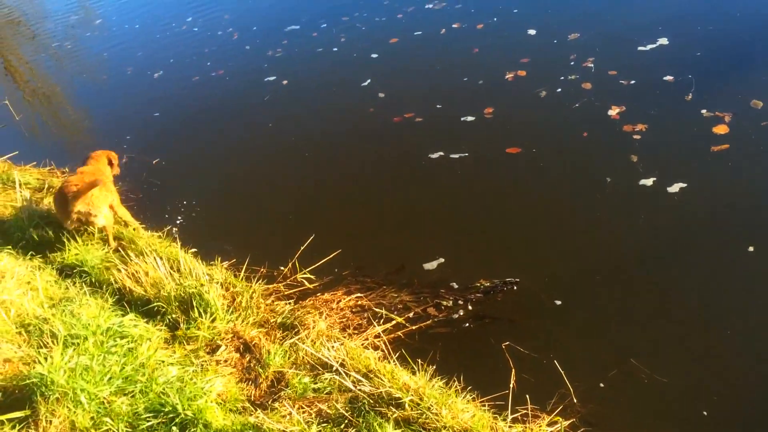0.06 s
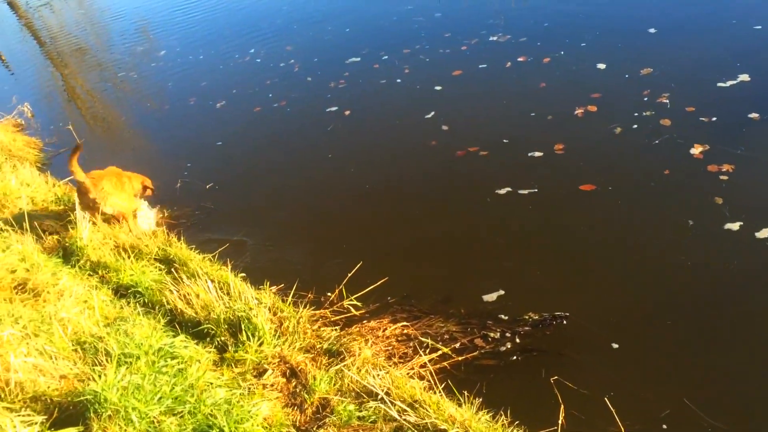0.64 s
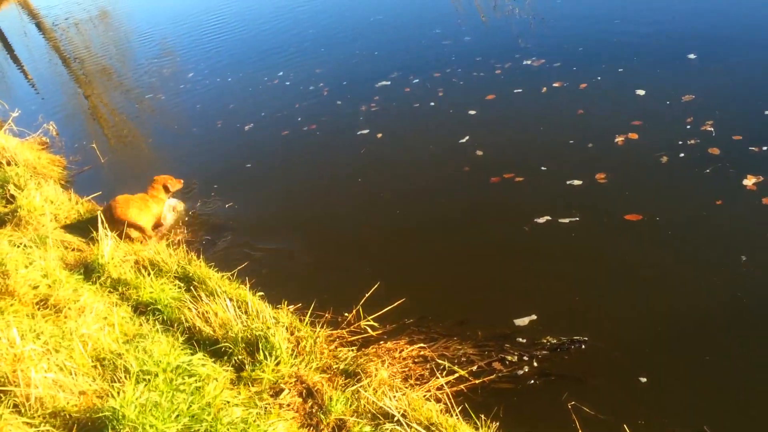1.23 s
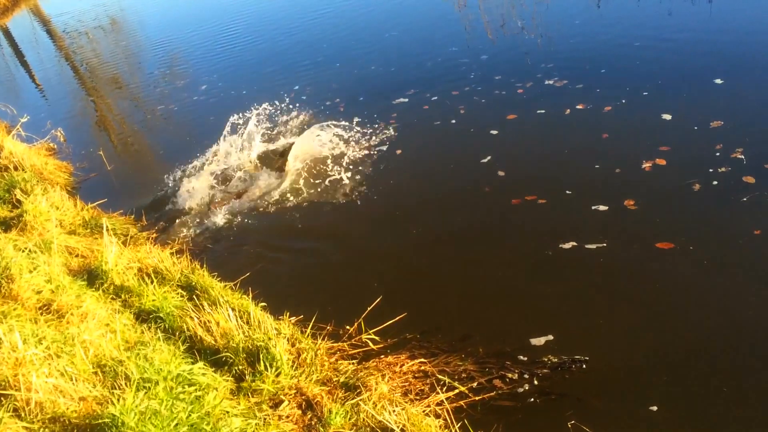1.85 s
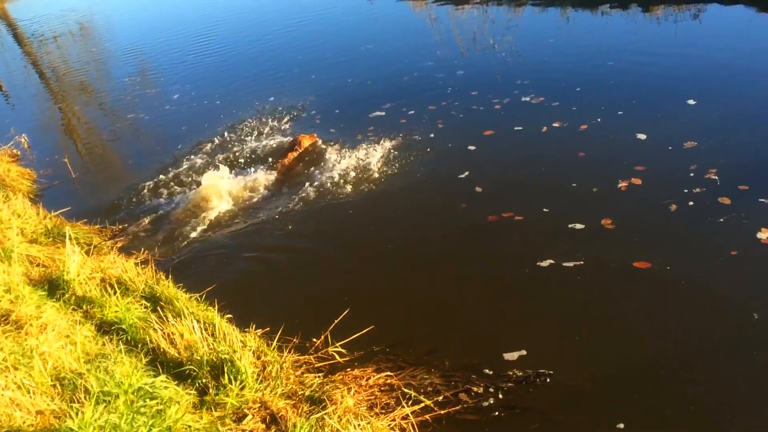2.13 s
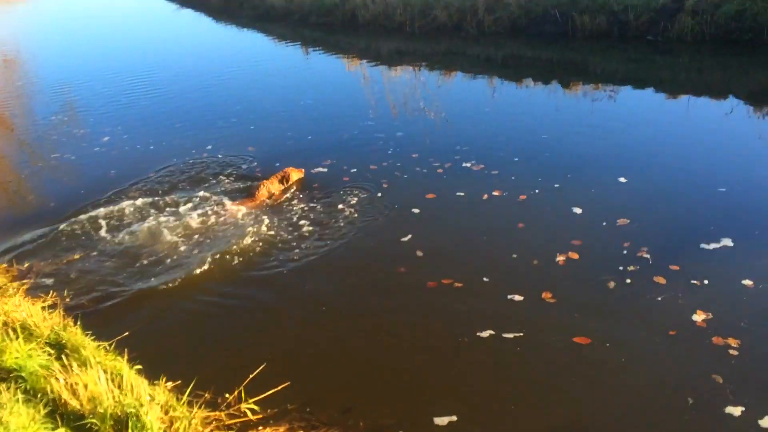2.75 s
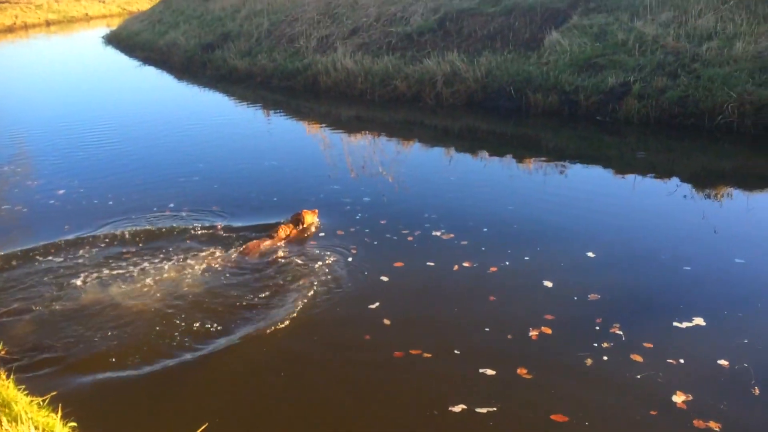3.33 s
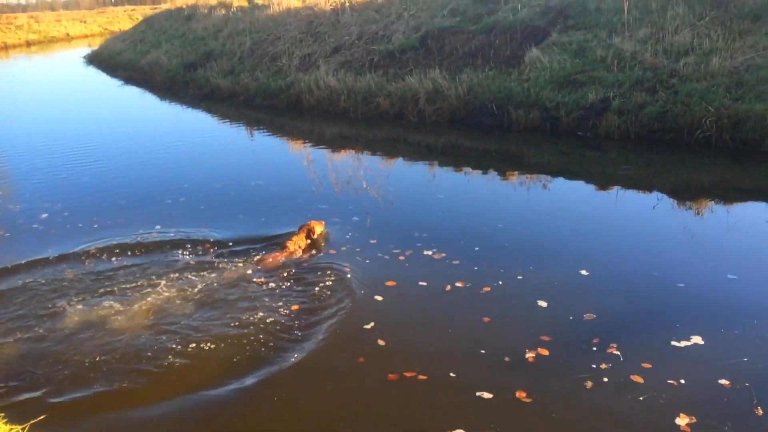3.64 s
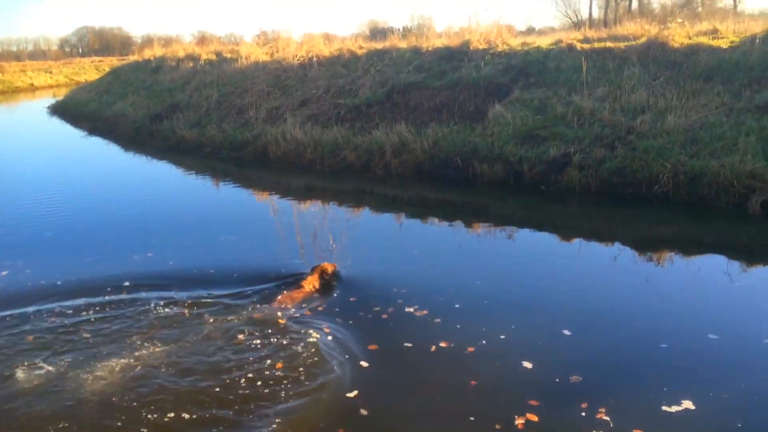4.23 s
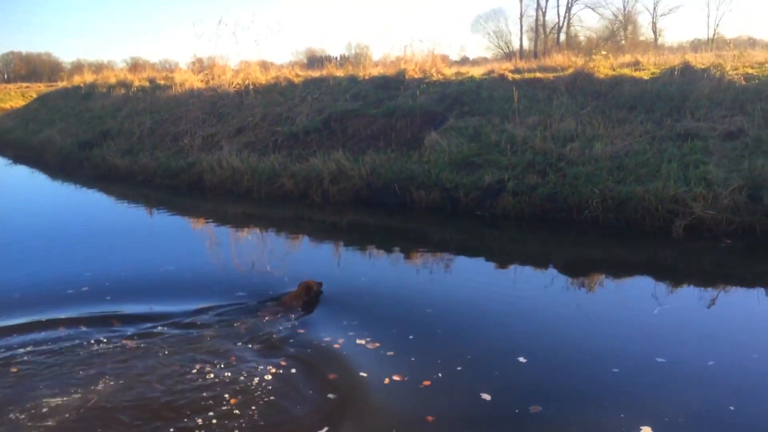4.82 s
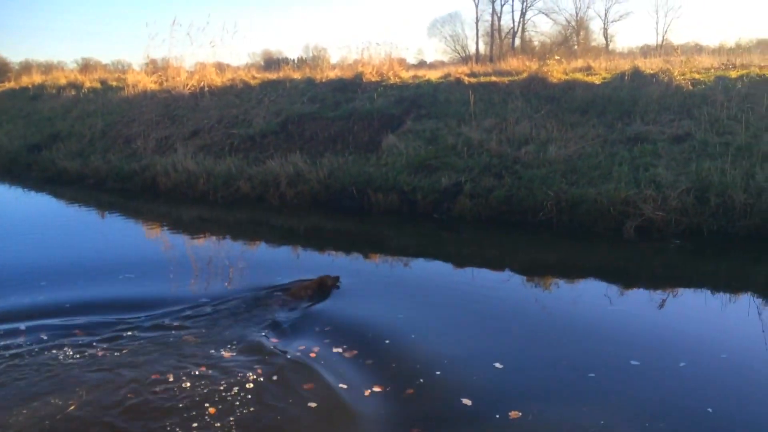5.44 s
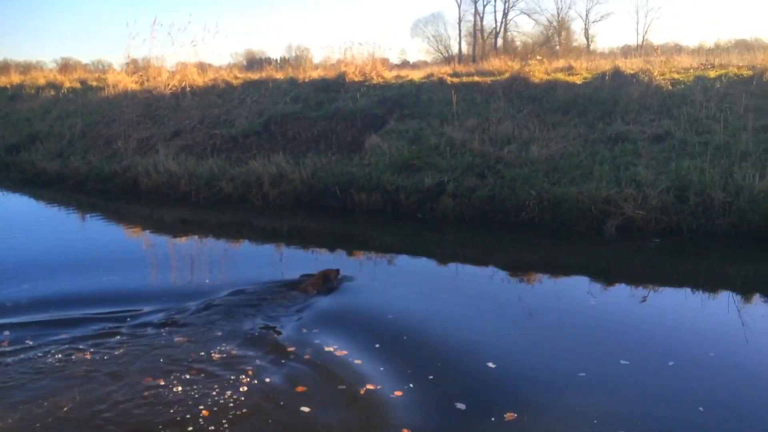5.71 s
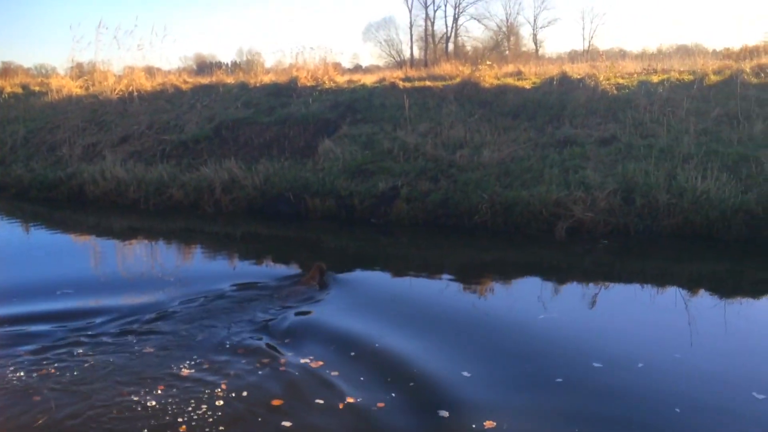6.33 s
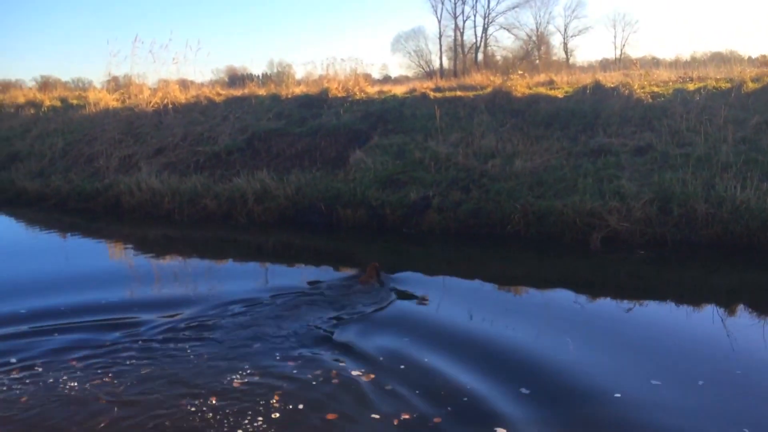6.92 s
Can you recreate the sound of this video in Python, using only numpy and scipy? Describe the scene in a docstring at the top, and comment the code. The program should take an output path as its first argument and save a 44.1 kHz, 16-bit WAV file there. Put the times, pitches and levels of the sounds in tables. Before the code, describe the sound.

Heard from a hand-held camera on a grassy river bank, paws stir shallow water and dry stalks rustle softly. A dog then plunges in, churning up bubbles as spray falls back. Fingers knock and click on the case at very close range, peaking above the splash. Afterwards only soft paddling and scattered plops remain, fading into a low wind rumble and a faint far-off hum.

```python
"""A dog wades in at a grassy river bank, leaps into the water with a splash and paddles away.
Its body drives air under in deep gulps, bubbles ring and thrown spray patters back. The microphone is
on the bank, in a hand-held camera: dry grass crackles nearby, and the hand knocks, clicks and rubs the
case at point-blank range. Behind it all lie light wind on the microphone, a distant hum, a far engine
and a faint whine from the camera's electronics."""
import sys
import numpy as np
from scipy import signal
from scipy.fft import rfft, irfft
from scipy.io import wavfile

SR = 44100
rng = np.random.default_rng(int(sys.argv[2]) if len(sys.argv) > 2 else 0)


def dump_mix(stems):
    """Bounce the given channels to the path in sys.argv[1] as a 16-bit WAV at rate SR."""
    frames = np.atleast_2d(stems).T  # one column per channel
    limited = np.clip(frames, -1, 1)  # hard clip at full scale
    pcm = np.round(limited * 32767).astype(np.int16)
    wavfile.write(sys.argv[1], SR, pcm)


N = 307356
TIME = np.arange(N) / SR

# Background spectra: wind on the microphone, distant hum, far engine.
# Each row: frequency in Hz, relative level in dB.
WIND_SPECTRUM = [(12, -69), (20, -34), (42, -8.5), (64, -0.5), (82, -4), (129, -8), (167, -11),
                 (199, -23.5), (260, -23), (340, -36), (570, -120)]
HUM_SPECTRUM = [(140, -5), (205, 3), (340, -0.5), (450, -5), (700, 1.5), (1000, 1.5), (1300, -8.5),
                (1750, -18), (2500, -21.5), (2900, -23.5), (3800, -21.5), (5400, -26), (13700, -31),
                (15500, -40)]
ENGINE_SPECTRUM = [(100, -74), (230, -7), (255, -11), (275, -23), (300, 5.5), (320, -16), (348, -0.5),
                   (385, -8.5), (600, -79)]
# The engine drawing nearer. Each row: time in seconds, level in dB.
ENGINE_LEVEL = [(0, -69.5), (4.5, -66.5), (5.7, -67.5), (6.3, -60.5), (6.97, -62)]
# Tones of the camera's electronics. Each row: frequency in Hz, level in dB.
WHINE_TONES = [(2918, -83), (3639, -85.5), (4387, -98), (5114, -94), (5835, -90.5), (6557, -93),
               (7305, -93), (8032, -91)]

# Close spectra: dry grass, skin on the case, a click of the case.
# Each row: frequency in Hz, relative level in dB.
GRASS_SPECTRUM = [(1200, -27), (2400, 20.5), (3300, -12), (5000, 1), (7500, 1.5), (10500, -8), (13500, -1),
                  (15500, -5)]
RUB_SPECTRUM = [(70, -14), (200, -6.5), (440, 3), (760, 0.5), (1250, 4), (1750, -15), (3300, -19),
                (5000, -26.5), (8000, -34.5), (13500, -39), (15500, -50)]
CLICK_SPECTRUM = [(200, -1), (500, -0.5), (900, -5.5), (1850, 5), (2450, 5.5), (3400, -7.5), (4350, -2),
                  (5400, -7.5), (7800, -9), (8800, -15.5), (10300, -15.5), (11600, -23), (13300, -21),
                  (15500, -32)]
# Grass brushed on the bank. Each row: start in seconds, level in dB.
GRASS_BRUSHES = [(-.03, -61), (.2, -63.5), (.44, -63.5), (.54, -63.5), (.745, -55), (.81, -69), (.90, -62),
                 (1.01, -58), (1.12, -66.5), (1.25, -73), (6.785, -68)]
# The hand sliding on the case. Each row: start in seconds, hold in seconds, level in dB.
HAND_SLIPS = [(2.638, .2, -41.5), (2.698, .033, -30.5), (2.809, 0.0061, -29)]
# The case giving under the grip. Each row: start in seconds, level in dB, tilt in dB per octave.
CASE_CLICKS = [(0.362, -34, -0.5), (0.6084, -35.5, 5.5), (0.7823, -27.5, -.4), (1.035, -36, 6),
               (1.0477, -31.5, -6.8), (1.09, -41, 1), (1.2893, -36, 3.5), (1.7662, -32, 4),
               (2.6603, -38, 2), (2.8015, -40, 1), (2.8378, -13, -0.5), (2.8237, -8, -2.5), (2.828, -9, -6),
               (2.8352, -13.5, 3),  (2.8461, -16.5, -3), (2.8495, -17.5, -2), (3.015, -34.5, -4),
               (3.0208, -25.5, -1.2)]
# Resonances of the case. Each row: frequency in Hz, relative level in dB, t60 in seconds.
CASE_MODES = [(658, -5.5, 0.012), (1110, 0, 0.0046), (1337, -6, 0.0083), (1920, -25, 0.013),
              (3070, -24, 0.0016), (4250, -31, 0.0021)]
# Finger knocks. Each row: start in seconds, peak in dB, pitch factor, ring time factor,
# hardness in dB per octave.
FINGER_KNOCKS = [(.4190, -36.5, 1.37, 1, -8), (0.435, -36.5, 1.14, 1.4, 3.5), (0.452, -33, 0.89, 1.1, -2),
                 (0.4702, -32.5, 1.2, 1.6, 2), (.4880, -31, 1.1, 1.4, -10), (2.0526, -3, 1.02, 1.17, 3.5),
                 (2.3708, -22, 0.98, 0.88, 3), (2.423, -24.5, 0.96, 3.3, 6), (2.6621, -6, 0.98, 1.57, 3),
                 (2.764, -16, 0.46, 0.93, 3.5), (2.769, -17.5, 0.96, 1.7, 0), (2.784, -25, 0.97, 0.85, -1),
                 (2.8236, -1.5, 0.95, 0.68, 5), (2.8273, -1, 0.85, 1.16, 8.5), (3.086, -25, 0.72, 0.87, 2)]
# Dips cut by the microphone port. Each row: centre in Hz, half width in Hz, gain in dB.
PORT_DIPS = [(472, 106, -4), (967, 82, -5), (1454, 92, -1), (2380, 150, -3), (2800, 150, -8),
             (3507, 115, -15.5), (4700, 76, -6), (5570, 160, -12)]

# Spectra out on the river: drips from the coat, ripples, spray, churned bubbles, deep gulps.
# Each row: frequency in Hz, relative level in dB.
DRIP_SPECTRUM = [(1500, -1), (2250, -12), (2750, -8.5)]
RIPPLE_SPECTRUM = [(500, -1), (700, 4), (1200, 9.5), (1700, 1.5), (2300, 4.5), (2900, -21), (3900, -8),
                   (5500, -20)]
SPRAY_SPECTRUM = [(1200, -51), (2400, 11.5), (3100, 6.5), (4000, 3.5), (5100, -5), (6000, -8.5), (8000, -9),
                  (11000, -13.5), (13500, -12), (15500, -15)]
CHURN_SPECTRUM = [(400, -8), (540, 0), (720, 4.5), (950, 2), (1150, 3), (1500, -5), (1900, 0), (2150, -15),
                  (2500, -29), (3000, -14)]
GULP_SPECTRUM = [(50, -21), (120, -4), (220, -5.5), (320, -3), (450, -15)]
# Single bubbles that stand out. Each row: start in seconds, starting pitch in Hz, relative level in dB.
PLOP_BUBBLES = [(.730, 1920, -45), (.821, 1750, -40), (.911, 1610, -38), (.944, 1086, -43.5),
                (1.224, 700, -40), (1.328, 1086, -34.5), (1.376, 864, -31.5), (1.444, 640, -32),
                (1.457, 1850, -34.5), (1.599, 820, -36), (1.604, 270, -17), (1.610, 67, -16),
                (1.632, 727, -21), (1.7245, 230, -23), (1.725, 690, -29.5), (1.846, 288, -26),
                (1.874, 225, -23), (1.887, 700, -31), (1.964, 295, -22), (2.011, 670, -29),
                (2.164, 693, -29.5), (2.2305, 627, -30.5), (2.599, 1185, -33), (2.931, 2040, -43.5),
                (3.143, 650, -38.5), (3.174, 1167, -39), (3.268, 1080, -39), (3.376, 2100, -50),
                (3.506, 637, -45), (4.188, 692, -38.5), (4.329, 2430, -47), (4.361, 1120, -45.5),
                (4.690, 2060, -51.5), (4.780, 1010, -40), (5.366, 1930, -57), (5.372, 554, -47),
                (5.544, 2270, -50.5), (5.640, 1150, -46), (5.712, 2200, -52), (6.302, 2240, -55),
                (6.378, 563, -41), (6.577, 1620, -54.5)]
# Paws wading in, later swimming. Each row: start in seconds, relative level in dB.
PAW_STROKES = [(-.02, -56), (.205, -58.5), (.355, -49), (.43, -56), (.50, -56), (.71, -50.5), (.77, -46),
               (.81, -55), (.885, -50), (1.02, -47.5), (1.085, -51), (1.205, -54), (2.925, -53),
               (3.14, -54), (3.29, -52), (3.85, -56), (4.64, -58), (4.81, -54.5), (5.255, -62),
               (5.525, -54.5), (5.615, -53), (6.27, -65), (6.78, -66)]
# The dog bounds in, lands at 1.59 s and thrashes off. Each row: start in seconds, strength in dB,
# offset of the gulp in dB, settling time in seconds.
DOG_LUNGES = [(1.199, -48.5, 0.5, .04), (1.313, -48.5, 4, 0.055), (1.365, -49.5, 2, 0.073),
              (1.433, -43, -14, 0.042), (1.517, -42.5, -5, 0.13), (1.59, -36.5, 5.5, 0.084),
              (1.635, -38.5, -10, .09), (1.725, -39.5, 1, 0.3), (1.79, -45.5, -3, 0.22),
              (1.935, -39, 2, 0.077), (2.361, -46.5, -3.5, 0.41), (2.51, -38, -7, 0.036),
              (2.585, -46, -1, 0.032)]

LUNGE_RISE_S = 0.0087
SHOWER_START_S, SHOWER_RISE_S = 1.997, 0.031  # the thrown sheet of water comes down again


def gain_of(db):
    """Decibels to amplitude."""
    return 10 ** (np.asarray(db) / 20)


def unit_rms(x):
    """Scales to rms 1."""
    return x / np.sqrt(np.mean(x ** 2) + 1e-20)


def db_at(spectrum, hz):
    """A spectrum's level in dB at any frequency."""
    row_hz, db = np.transpose(spectrum)
    return np.interp(np.log(hz + 1), np.log(row_hz + 1), db)


def add(mix, start, sound):
    """Mixes a sound in at a time in seconds."""
    part = mix[max(round(start * SR), 0):][:len(sound)]
    part += sound[:len(part)]


def swell(start, db, rise_s, fall_s, hold_s=0):
    """One envelope: straight attack, hold, exponential release."""
    age = TIME - start
    release = np.exp(-np.clip((age - rise_s - hold_s) / fall_s, 0, 20))
    return gain_of(db) * np.clip(age / rise_s, 0, 1) * release


def power_sum(envelopes):
    """Overlapping envelopes add in power."""
    return np.sqrt(sum(one ** 2 for one in envelopes))


def colour(x, spectrum, tilt_db=0, size=2048):
    """Causal filter with the given spectrum, tilted in dB per octave above 500 Hz."""
    hz = abs(np.fft.fftfreq(size, 1 / SR))
    log_gain = np.log(gain_of(db_at(spectrum, hz) + tilt_db * np.log2(np.maximum(hz, 500) / 2000)))
    taps = np.fft.ifft(np.exp(np.conj(signal.hilbert(log_gain)))).real  # minimum phase
    return signal.fftconvolve(x, taps[:size // 2])[:len(x)]


def noise(spectrum):
    """Steady noise with the given spectrum."""
    hz = np.fft.rfftfreq(N, 1 / SR)
    return unit_rms(irfft(rfft(rng.standard_normal(N)) * gain_of(db_at(spectrum, hz)), N))


def drift(rate_hz):
    """Slow random wandering of rms 1."""
    hz = np.fft.rfftfreq(N, 1 / SR)
    return unit_rms(irfft(rfft(rng.standard_normal(N)) / (1 + (hz / rate_hz) ** 4), N))


def impacts(per_s, spread_db):
    """Random impulses, most small and a few large."""
    size = gain_of(spread_db * np.minimum(rng.exponential(1, N), 3.5))
    return size * rng.choice([-1, 1], N) * (rng.random(N) < per_s / SR)


def patter(spectrum, per_s, spread_db):
    """A stream of tiny impacts with the given spectrum, at rms 1."""
    return unit_rms(colour(impacts(per_s, spread_db), spectrum))


def distant_hum():
    """The far surroundings hum, wavering slightly."""
    return gain_of(-55.5) * noise(HUM_SPECTRUM) * gain_of(0.1 * drift(rate_hz=7))


def far_engine():
    """An engine drones a long way off, louder as it draws nearer."""
    return gain_of(np.interp(TIME, *np.transpose(ENGINE_LEVEL))) * noise(ENGINE_SPECTRUM)


def wind():
    """Light eddies rumble unevenly on the microphone."""
    eddies = gain_of(0.8 * drift(rate_hz=10))
    return gain_of(-48.5) * unit_rms(noise(WIND_SPECTRUM) * eddies)


def whine():
    """Thin steady tones from the electronics beside the microphone."""
    return sum(np.sqrt(2) * gain_of(db) * np.sin(2 * np.pi * (hz * TIME + rng.random()))
               for hz, db in WHINE_TONES)


def grass():
    """Dry stalks crackle against each other nearby on the bank."""
    bending = power_sum(swell(start, db, rise_s=0.025, fall_s=0.048) for start, db in GRASS_BRUSHES)
    return bending * patter(GRASS_SPECTRUM, per_s=2700, spread_db=4.5)


def hand_rub():
    """Skin sticks and slips on the case, right at the microphone."""
    pressure = power_sum(swell(start, db, rise_s=0.0077, fall_s=0.013, hold_s=hold)
                         for start, hold, db in HAND_SLIPS)
    return pressure * patter(RUB_SPECTRUM, per_s=4000, spread_db=1)


def case_clicks(rattle_db=-3, rattle_s=0.00091):
    """The case gives under the grip with a sharp snap and a very short rattle."""
    out, t = np.zeros(N), np.arange(SR // 40) / SR
    for start, db, tilt_db in CASE_CLICKS:
        snap = colour(1.0 * (t == 0), CLICK_SPECTRUM, tilt_db)
        burst = rng.standard_normal(len(t)) * np.exp(-t / rattle_s) * (t > rattle_s / 2)
        rattle = colour(burst, CLICK_SPECTRUM, tilt_db)
        rattle *= gain_of(rattle_db) * np.linalg.norm(snap) / np.linalg.norm(rattle)
        add(out, start, gain_of(db) * (snap + rattle) / abs(snap).max())
    return out


def finger_knocks():
    """Each blow rings the damped modes of the case; hard blows reach the higher ones."""
    out, t = np.zeros(N), np.arange(SR // 20) / SR
    for start, db, pitch, ring, hardness in FINGER_KNOCKS:
        modes = np.zeros(len(t))
        for k, (hz, mode_db, t60) in enumerate(CASE_MODES):
            envelope = gain_of(mode_db + hardness * np.log2(hz / 1000) - 60 * t / (t60 * ring))
            modes += (-1) ** k * envelope * np.sin(2 * np.pi * hz * pitch * t)  # neighbours oppose
        add(out, start, gain_of(db) * modes / abs(modes).max())
    return out


def microphone_port(x):
    """The port hollows the sound from the river with narrow dips."""
    hz = np.fft.rfftfreq(N, 1 / SR)
    dips_db = sum(db * np.exp(-((hz - centre) / width) ** 2) for centre, width, db in PORT_DIPS)
    return irfft(rfft(x) * gain_of(dips_db), N)


def banks(x, t60=0.44, wet_db=-14):
    """The grassy banks scatter a faint, dull tail back to the microphone."""
    t = np.arange(SR // 2) / SR
    echoes = rng.standard_normal(len(t)) * (rng.random(len(t)) < 0.05) * (t > 0.004)
    tail = signal.lfilter(*signal.butter(1, 3000, fs=SR), echoes * gain_of(-60 * t / t60))
    return x + gain_of(wet_db) * signal.fftconvolve(x, tail / np.linalg.norm(tail))[:N]


def bubble(hz, t60, climb):
    """A pocket of air swells into ringing, dies and climbs in pitch as it nears the surface."""
    t = np.arange(int(t60 * SR) + 2) / SR
    onset = 1 - np.exp(-(1.5 * hz * t) ** 2)
    return np.sin(2 * np.pi * hz * (t + climb * t * t / t60)) * gain_of(-60 * t / t60) * onset


def bubble_cloud(spectrum, per_s, spread_db, cycles, sizes=36):
    """Bubbles of many sizes ring at random, as loud at each pitch as the spectrum says."""
    out = np.zeros(N)
    for hz in np.geomspace(spectrum[0][0], spectrum[-1][0], sizes):
        births = impacts(per_s / sizes, spread_db)
        stream = signal.oaconvolve(births, bubble(hz, cycles / hz, climb=0.21))[:N]
        out += gain_of(db_at(spectrum, hz)) * np.sqrt(hz) * unit_rms(stream)
    return unit_rms(out)


def drips():
    """Odd drips from the wet coat ping in the river."""
    return gain_of(-75) * bubble_cloud(DRIP_SPECTRUM, per_s=24, spread_db=2.5, cycles=60, sizes=12)


def paddling(trickle_db=-1.5, flick_db=-15, fizz_db=-17):
    """Paws stir up a trickle of small bubbles and flick droplets; the wake fizzes, then calms."""
    trickle = bubble_cloud(RIPPLE_SPECTRUM, per_s=650, spread_db=3.6, cycles=24)
    droplets = patter(SPRAY_SPECTRUM, per_s=2500, spread_db=8.5)
    strokes = power_sum(swell(start, db, rise_s=0.015, fall_s=0.032) for start, db in PAW_STROKES)
    wake = swell(start=0.86, db=-54.5, rise_s=0.77, fall_s=0.53, hold_s=1.37)
    ripple = gain_of(np.where(TIME < SHOWER_START_S, -62.5, -75))  # wading, then swimming
    trickle_level = gain_of(trickle_db) * power_sum([strokes, wake, ripple])
    droplet_level = power_sum([gain_of(flick_db) * strokes, gain_of(fizz_db) * wake])
    return trickle_level * trickle + droplet_level * droplets


def plops(stir, slap_db=-12, slap_s=0.0021, ring_db=2, shed_db=-12, foam_db=-41.5):
    """Water slaps shut over a ringing bubble, which sheds four more; foam damps the ringing."""
    out, t = np.zeros(N), np.arange(SR // 30) / SR
    for start, hz, db in PLOP_BUBBLES:
        damping = 1 + np.interp(start, TIME, stir) / gain_of(foam_db)
        t60 = 0.05 * (1000 / hz) ** 0.4 / damping  # large bubbles ring longer
        messy_db = db - 4 * max(np.log2(hz / 900), 0)  # small ones ping more cleanly
        band = signal.butter(3, [hz * 0.65, hz * 1.5], "bandpass", fs=SR)
        slosh = unit_rms(signal.lfilter(*band, rng.standard_normal(len(t))))
        add(out, start, gain_of(messy_db + slap_db) * slosh * t / slap_s * np.exp(1 - t / slap_s))
        ring = bubble(hz, t60, climb=0.099)
        fade_in = np.minimum(np.arange(len(ring)) / (0.033 * len(ring)), 1)
        add(out, start, gain_of(db + ring_db) * ring * fade_in)
        for lag, detune in rng.random((4, 2)):
            shed = bubble(hz * 2 ** (0.2 * (2 * detune - 0.9)), t60 / 2, climb=0.16)
            add(out, start + 0.026 * lag, gain_of(messy_db + shed_db) * shed)
    return out


def churning():
    """How hard the water is stirred by each lunge and by the shower that follows the landing."""
    lunges = [swell(start, db, LUNGE_RISE_S, settle) for start, db, _, settle in DOG_LUNGES]
    shower = swell(SHOWER_START_S, db=-37.5, rise_s=SHOWER_RISE_S, fall_s=0.19)
    return power_sum(lunges + [shower])


def leap(stir, stirred_gulp_db=-11, thrown_db=-15.5):
    """The dog's body drives big pockets of air under; small bubbles churn and spray patters back."""
    gulps = [swell(start, db + gulp_db, LUNGE_RISE_S, fall_s=0.77 * settle)
             for start, db, gulp_db, settle in DOG_LUNGES]
    thrown = [swell(start, db + thrown_db, rise_s=0.036, fall_s=settle)
              for start, db, _, settle in DOG_LUNGES]
    shower = swell(SHOWER_START_S, db=-49.5, rise_s=SHOWER_RISE_S, fall_s=0.07, hold_s=0.12)
    churn = stir * bubble_cloud(CHURN_SPECTRUM, per_s=2400, spread_db=2.5, cycles=23.7)
    pockets = bubble_cloud(GULP_SPECTRUM, per_s=340, spread_db=2.5, cycles=8.4, sizes=14)
    plunge = power_sum(gulps + [gain_of(stirred_gulp_db) * stir]) * pockets
    spray = power_sum(thrown + [shower]) * patter(SPRAY_SPECTRUM, per_s=5000, spread_db=2.5)
    return gain_of(1) * churn + gain_of(-0.5) * plunge + gain_of(1.45) * spray


def scene():
    """One microphone on the bank: the dog out in the river, grass and handling close, hum far off."""
    stir = churning()
    splashing = microphone_port(leap(stir) + paddling() + drips())
    river = banks(splashing + plops(stir))
    close = grass() + finger_knocks() + case_clicks() + hand_rub() + wind()
    background = distant_hum() + far_engine() + whine()
    return (river + close + background)[None]


def record(dry, bass_cut_hz=39, overload=0.93, band_limit_hz=15550):
    """The recorder's bass cut, overload and band limit."""
    cut = signal.lfilter(*signal.butter(3, bass_cut_hz, "highpass", fs=SR), dry)
    held = np.clip(cut, -overload, overload)
    lowpass = signal.firwin(511, band_limit_hz, window=("kaiser", 9), fs=SR)
    return signal.oaconvolve(held, lowpass[None], "same")


dry = scene()
out = record(dry)
dump_mix(out)
```